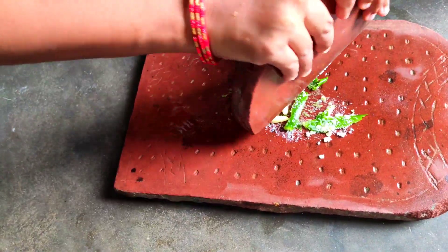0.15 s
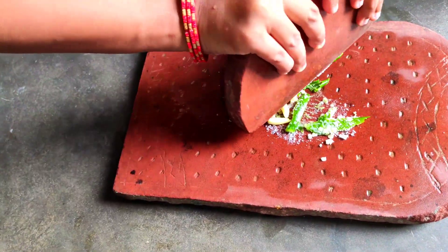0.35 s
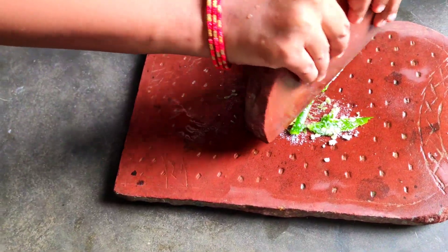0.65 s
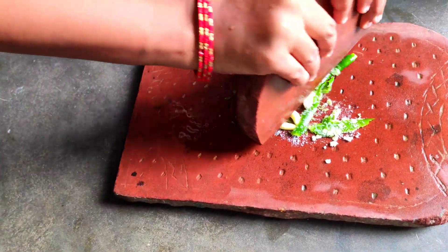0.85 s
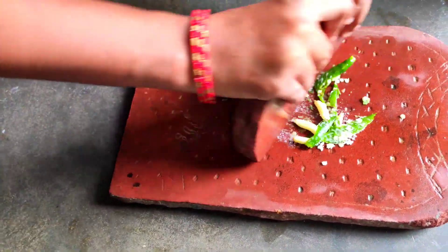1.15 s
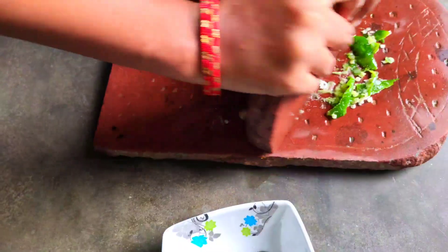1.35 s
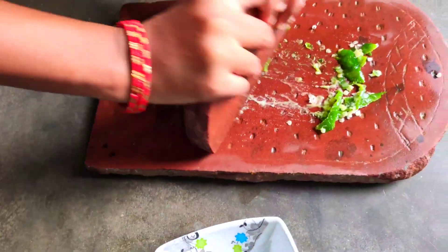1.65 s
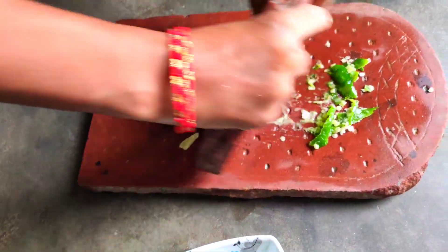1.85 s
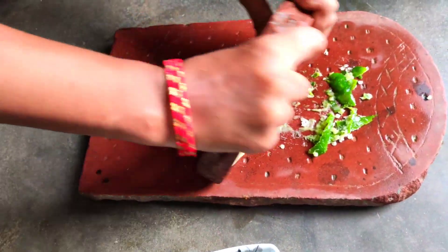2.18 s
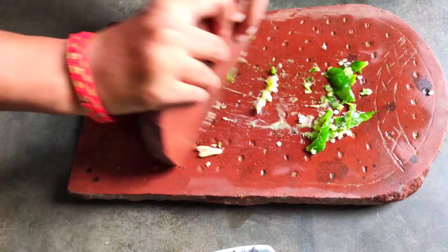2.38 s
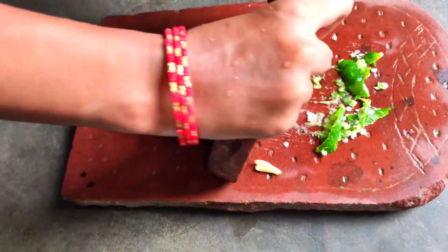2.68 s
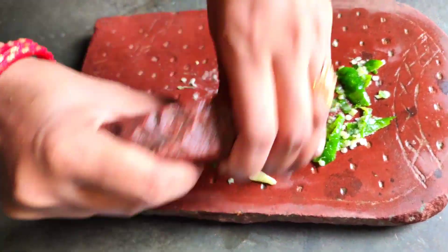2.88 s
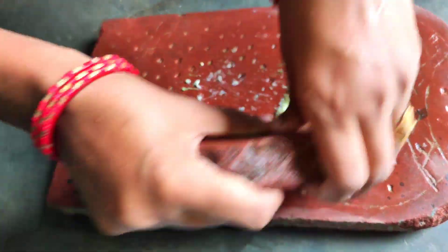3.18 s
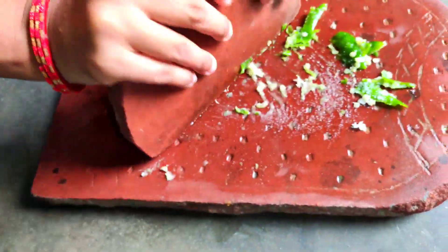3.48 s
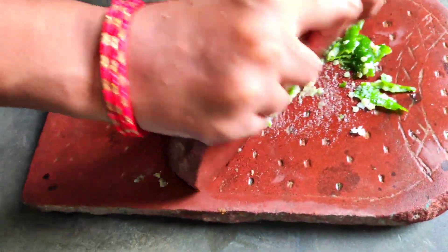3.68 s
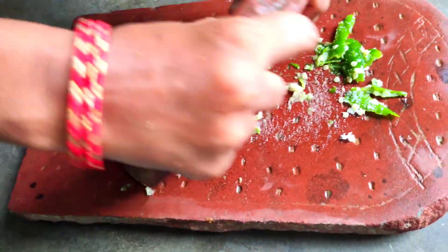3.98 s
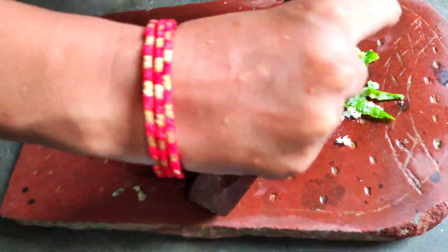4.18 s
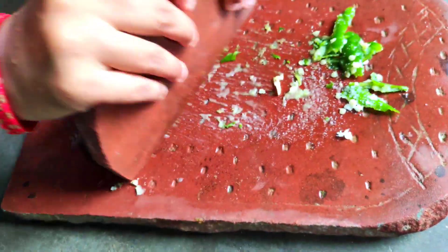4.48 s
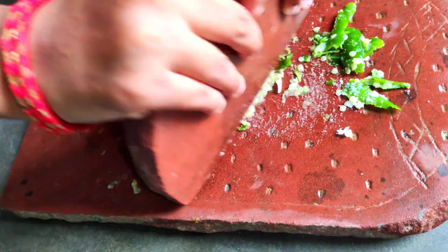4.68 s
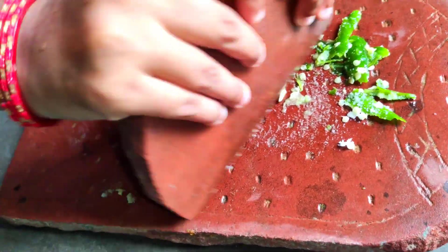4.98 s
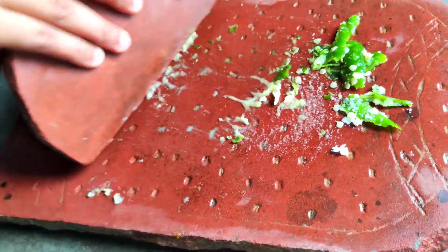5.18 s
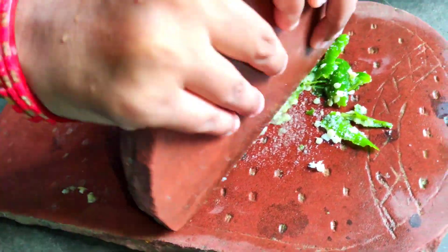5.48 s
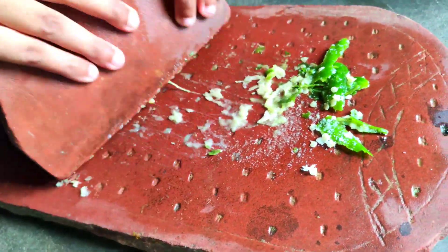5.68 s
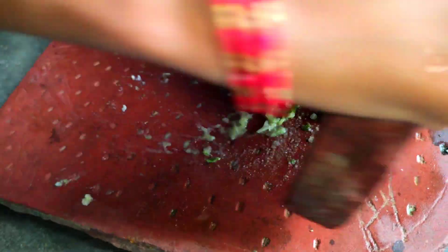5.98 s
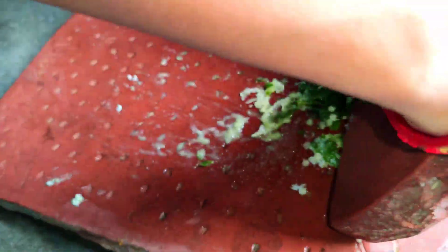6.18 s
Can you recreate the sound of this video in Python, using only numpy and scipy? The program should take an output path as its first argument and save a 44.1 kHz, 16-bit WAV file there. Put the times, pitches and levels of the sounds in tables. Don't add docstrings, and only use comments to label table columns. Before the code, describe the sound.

Close up in a small hard kitchen, a heavy stone slides over a flat stone slab. It opens with light gritty hisses and tiny crackles of salt and skins, then a hard knock starts quick back-and-forth rasping strokes. Loud stone clacks interrupt the rubbing, the heaviest as a pair near the middle. Thin bangles clink later and a faint bird whistles far off.

```python
import sys
import numpy as np
from scipy import signal
from scipy.fft import rfft, irfft
from scipy.io import wavfile

SR = 44100
rng = np.random.default_rng(int(sys.argv[2]) if len(sys.argv) > 2 else 0)


def volts_from_decibels(level):
    exponent = np.asarray(level, float) / 20
    return 10 ** exponent


def wav_record(signal):
    frames = np.transpose(np.atleast_2d(signal))
    bounded = np.clip(frames, -1, 1)
    quanta = np.round(bounded * 32767).astype(np.int16)
    wavfile.write(sys.argv[1], SR, quanta)


N = 279594
T = np.arange(N) / SR
OPPOSITE = np.array([[1], [-1]])


def level(x, db):
    return x * volts_from_decibels(db) / np.sqrt(np.mean(x ** 2))


def walk(rate):
    return np.sqrt(3 / 2) * np.interp(T * rate, np.arange(1024), rng.standard_normal(1024))


def ring(x, modes):
    out = 0
    for k, (hz, width, db) in enumerate(modes):
        pole = np.exp((2j * hz - width) * np.pi / SR)
        resonance = signal.lfilter([0, pole.imag], [1, -2 * pole.real, abs(pole) ** 2], x)
        out = out + (-1) ** k * volts_from_decibels(db) * np.sqrt(width) * resonance
    return out


def near_db(hz, best_hz, db_per_octave):
    return -db_per_octave * np.abs(np.log2(hz / best_hz))


def highpass(x, order, hz):
    return signal.sosfilt(signal.butter(order, hz, "highpass", fs=SR, output="sos"), x)


def add(out, s, sound, db):
    i = int(s * SR)
    sound = sound[:N - i] / np.abs(sound).max()
    out[:, i:i + len(sound)] += sound * volts_from_decibels(db)


def band(x, hz, octaves):
    edges = np.clip(hz * 2. ** (np.array([-.5, .5]) * octaves), 10, .45 * SR)
    return signal.sosfilt(signal.butter(2, edges, "bandpass", fs=SR, output="sos"), x)


def stereo_noise(count, hz, octaves):
    mid, side = band(rng.standard_normal((2, count)), hz, octaves)
    return mid + min(hz / 1100, 1) * side * OPPOSITE


# (frequency [Hz], density [dB per Hz])
AIR_SPECTRUM = [(20, -11.5), (65, 0), (104, -17), (203, -6), (2520, -11.5), (4920, -20), (14600, -23.5),
                (15900, -30)]


def air():
    hz, db = np.transpose(AIR_SPECTRUM)
    out = 0
    for f in 25 * 2 ** np.arange(0, 9.5, .5):
        band_db = np.interp(np.log(f), np.log(hz), db) + 0.71 * walk(2.9)
        out = out + volts_from_decibels(band_db) * stereo_noise(N, f, 0.43)
    return level(out, -61.5)


# (fastest time [s], speeding up [s], slowing down [s], slab rumble [dB], grit rasp [dB re slab])
STROKE_MOTION = [(0.874, .047, 0.059, -31, -4.5), (1.135, 0.05, 0.036, -31, -5.5),
                 (1.279, .047, 0.058, -32, -6.5), (1.494, 0.086, .05, -38, -7),
                 (1.669, 0.057, 0.053, -31.5, -9.5), (2.119, 0.089, 0.06, -31, -9.5),
                 (2.355, 0.064, 0.054, -35.5, -3.5), (2.523, 0.062, .06, -31.5, -6),
                 (3.185, 0.082, .08, -35.5, -17), (3.554, 0.072, 0.051, -33, -9.5),
                 (3.725, 0.051, 0.067, -35, -3.5), (3.892, 0.041, 0.023, -31.5, -20),
                 (3.978, 0.047, 0.032, -38.5, -9), (4.273, 0.06, 0.066, -36, -3),
                 (4.52, 0.09, 0.059, -32.5, -8.5), (4.721, .07, .06, -41, -3.5),
                 (4.912, 0.068, .05, -37, -2), (5.325, 0.048, 0.063, -32, -4),
                 (5.589, 0.085, 0.021, -39.5, 0), (5.719, 0.046, 0.044, -32.5, -10.5),
                 (6.28, 0.065, .055, -34.5, -10)]
# (fastest time [s], speeding up [s], slowing down [s], slab rumble [dB], grit rasp [dB re slab])
LIGHT_SWEEPS = [(0.020, .1, 0.11, -60, -4), (0.110, .02, 0.089, -52, -12), (0.266, .05, .07, -60, 21),
                (0.305, .012, 0.023, -46, -23), (0.451, .1, 0.13, -65, 10.5),
                (0.686, .03, 0.015, -63, 17.5), (0.988, .04, .07, -57.5, 8),
                (3.240, 0.078, 0.096, -54, 9.5), (3.371, 0.11, 0.084, -52, 6.5),
                (5.481, .05, .04, -61.5, 6.5), (6.190, 0.04, .05, -45.5, -14)]
EDGE_DB, EDGE_POWER = -9.5, 2.56


def hand(lag_s, sharp, base_db, share):
    power = np.zeros(N // 32 + 1)
    t = T[::32]
    for s, rise, fall, slab_db, grit_db in STROKE_MOTION + LIGHT_SWEEPS:
        late = t - s - lag_s
        edge = np.abs(late / np.where(late < 0, rise, fall)) ** EDGE_POWER
        power = power + volts_from_decibels(2 * (slab_db + base_db + share * grit_db + sharp * EDGE_DB * edge))
    return np.interp(T, t, power)


# (time [s], peak [dB], muller [dB re slab], muller frequency [Hz], crack [dB re slab])
HARD_BLOWS = [
    (0.702, -2, -4.5, 2410, -22),
    (1.075, -13, -6, 2540, -23),
    (1.93, -4, 4.5, 1793, -9.5),
    (2.907, 0, -12.5, 1730, -35.5),
    (3.048, 1, -8.5, 2104, -29.5),
    (4.1, -1, -1, 1940, -39),
    (5.172, -6, 8, 2825, -6.5),
    (5.525, -15, -10.5, 1850, -17.5),
    (5.545, -10.5, -10.5, 1710, -29),
    (6.082, -9, 3.5, 1556, -34),
]


def skid(muller_share=0, crack_share=0, extra_db=0):
    rise_s, t60_s = 0.007, 0.51
    power = 0
    for s, db, muller_db, _, crack_db in HARD_BLOWS:
        late = np.maximum(T - s, 0)
        start_db = db + muller_share * muller_db + crack_share * crack_db + extra_db - 31
        power = power + np.minimum(late / rise_s, 1) ** 2 * volts_from_decibels(2 * (start_db - 60 * late / t60_s))
    return power


def catches(rate, spread_db, judder_db):
    hit = rng.random(N) < rate / SR
    size = rng.standard_normal(N) * volts_from_decibels(spread_db * np.minimum(rng.exponential(size=N), 4))
    return hit * size * volts_from_decibels(judder_db * walk(70))


def rub(x, modes, patchy_db, best_hz=None):
    out = 0
    for k, mode in enumerate(modes):
        db = patchy_db * walk(25)
        if best_hz is not None:
            db = db + near_db(mode[0], best_hz, 10.2)
        out = out + (-1) ** k * ring(x * volts_from_decibels(db), [mode])
    return out


# (frequency [Hz], width [Hz], level [dB])
SLAB_MODES = [(131, 46, -35.5), (182, 120, -32.5), (254, 170, -23), (341, 29, -13), (505.4, 253, -2.5),
              (634, 106, -0.5), (888, 159, -1.5), (1080, 129, 2), (1243, 260, 0)]
# (frequency [Hz], width [Hz], level [dB])
MULLER_MODES = [(1578, 90, -7), (1850, 207, 6), (2200, 450, 4), (2544, 236, 8), (2944, 850, 5)]
# (frequency [Hz], width [Hz], level [dB])
GRIT_MODES = [(3407, 220, -5.5), (4040, 360, -2), (4750, 520, -5), (5810, 900, -2.5), (6630, 1200, -6)]
# (frequency [Hz], width [Hz], level [dB])
DUST_MODES = [(8690, 1610, -3.5), (10360, 12500, 0), (15200, 3400, -6.5)]
# (time [s], best-driven slab pitch [Hz])
BEARING_PITCH = [(0.12, 600), (0.3, 930), (0.87, 1070), (1.14, 848), (1.49, 700), (1.66, 1100),
                 (2.12, 1000), (2.35, 808), (2.55, 843), (3.0, 812), (3.6, 800), (4.0, 867), (4.27, 750),
                 (4.52, 945), (4.8, 786), (5.33, 902), (5.71, 1023), (6.28, 677)]


def grinding():
    grit_lag_s = 0.0045
    weight = np.sqrt(hand(0, 0.97, 0, 0) + skid())
    ringing_gain = np.sqrt(hand(grit_lag_s / 2, 1, 0, 0.19) + skid(muller_share=1, extra_db=-1))
    rasp_gain = np.sqrt(hand(grit_lag_s, 1.07, 0.12, 0.62) + skid(crack_share=1, extra_db=5))
    hiss_gain = np.sqrt(hand(grit_lag_s, 0.95, -11, 1))

    pressure = np.maximum(weight / volts_from_decibels(-35.5), volts_from_decibels(-26))
    best_hz = np.interp(T, *np.transpose(BEARING_PITCH)) * pressure ** (0.0366 * 20 * np.log10(2))

    coarse = catches(2500, 2.26, 0.54)
    fine = catches(8000, 1.1, 1.76)
    mixed = level(coarse, -11.0) + level(fine, -1)
    body = level(rub(highpass(coarse, 2, 150), SLAB_MODES, 1.5, best_hz), -1.4) * weight
    ringing = level(rub(mixed, MULLER_MODES, 3.6), -1.4) * ringing_gain
    grit = level(rub(fine, GRIT_MODES, 1.5), -1.4) * rasp_gain
    dust = level(ring(rub(fine, DUST_MODES, 1.3), DUST_MODES), -1.4) * hiss_gain

    lag = np.round(4 * walk(9) * OPPOSITE).astype(int)
    return body + ringing + (grit + dust)[np.clip(np.arange(N) + lag, 0, N - 1)]


# (time [s], peak [dB])
EDGE_BURSTS = [(0.092, -32), (0.0938, -19.5), (0.152, -37), (0.166, -33), (0.1819, -32), (0.2035, -33.5),
               (0.2302, -31.5), (0.2487, -30), (0.2583, -33.5), (0.269, -31), (0.2724, -32),
               (0.3194, -39.5), (0.3366, -37), (0.365, -37.5), (0.3838, -38.5), (0.4139, -33.5),
               (0.4508, -46.5), (0.5144, -35.5), (0.5793, -43), (0.6628, -46.5), (0.679, -37), (0.687, -26)]
# (time [s], peak [dB], frequency [Hz])
GRAIN_POPS = [(0.8205, -50, 5000), (0.844, -30.5, 5110), (0.89, -29.5, 6170), (0.985, -31, 5060),
              (0.992, -34, 5500), (1.227, -30.5, 5330), (1.6048, -33, 4300), (2.4539, -26.5, 6800),
              (3.471, -39, 5460), (5.2728, -24.5, 6200), (5.8755, -38, 5310)]


def crackle():
    out, t = np.zeros((2, N)), T[:1024]
    bursts = [(s, db, 5530 * (1 + 0.02 * rng.standard_normal())) for s, db in EDGE_BURSTS]
    for s, db, hz in bursts + GRAIN_POPS:
        puff = rng.standard_normal(len(t)) * (np.exp(-t / 0.00029) + 0.11 * np.exp(-t / 0.0088))
        cycles = ring(ring(puff, [(hz, 2200, 0)]), [(hz, 2200, 0)])
        add(out, s, cycles, db + 4.0)
        add(out, s, ring(puff, DUST_MODES), db - 33.0)
    return out


# (time [s], peak [dB], muller [dB re slab], muller frequency [Hz], crack [dB re slab])
EDGE_TRIPS = [(0.119, -53, -26, 2050, -8), (0.299, -26.5, -23, 1700, -36),
              (0.841, -22.5, -2.5, 2520, -22.5), (1.246, -30.5, 12, 2570, 1.5),
              (1.638, -30.5, -11.5, 2000, -14), (2.034, -26, 8.5, 1830, -24.5),
              (2.074, -17, -6.5, 1850, -15.5), (2.133, -13, -20, 1740, -12), (3.689, -21.5, -7, 1960, -27),
              (4.445, -36.5, 6, 1790, -35), (5.188, -18, 1, 1890, -30.5), (5.673, -44, -10, 2540, -20)]
# (time [s], peak [dB])
FLOOR_THUDS = [
    (0.7, -43.5),
    (1.073, -53),
    (1.928, -44),
    (2.909, -35.5),
    (3.046, -32),
    (4.1, -47),
    (5.167, -31),
    (5.523, -46.5),
    (6.082, -43.5),
]


def blows():
    out, t = np.zeros((2, N)), T[:4096]
    tap = np.exp(-((t - .0003) / .00006) ** 2)
    push = highpass(tap, 3, 480)
    impacts = [(blow, 1011) for blow in HARD_BLOWS] + [(trip, 1100) for trip in EDGE_TRIPS]
    for (s, db, muller_db, muller_hz, crack_db), knock_hz in impacts:
        start = s - .0009
        hz = knock_hz * (1 + 0.033 * rng.standard_normal())
        crack = rng.standard_normal(len(t)) * np.minimum(t / 0.0024, 1) * np.exp(-t / 0.0035)
        slab = [(f, 5.64 * w, g + near_db(f, hz, 7.2)) for f, w, g in SLAB_MODES]
        muller = [(f, 0.94 * w, g + near_db(f, muller_hz, 9)) for f, w, g in MULLER_MODES]
        add(out, start, ring(ring(push, [(hz, 700, 0)]), [(hz, 600, 0)]), db + 0.5)
        add(out, start, ring(push, slab), db - 7)
        add(out, start, ring(ring(push, [(2200, 3740, 0)]), muller), db + muller_db + 2.0)
        add(out, start, ring(crack, GRIT_MODES), db + crack_db + 4)
        add(out, start, ring(crack, DUST_MODES), db + crack_db - 34)
    thud = ring(tap, [(75, 300, -7), (182.5, 24, 2.5), (243, 16, -4.5)])
    for s, db in FLOOR_THUDS:
        add(out, s, thud, db + 3.0)
    return out


# (time [s], peak [dB], frequency [Hz], upper modes [dB re lower], damping [1 = free])
BANGLE_CLINKS = [
    (2.564, -27.5, 9180, -19.5, 1),
    (3.03, -53, 9900, -9, 2.35),
    (3.9896, -35.5, 9660, -20, 0.99),
    (4.519, -26, 9260, -16, 1.6),
    (4.9823, -28.5, 9640, -19, 3.5),
    (5.4197, -34, 9600, -6.5, 5.5),
    (5.4447, -37, 9800, -8.5, 6),
    (5.875, -33, 9880, -13, 5.5),
]
# (frequency [Hz], width [Hz], level [dB])
BANGLE_MODES = [(9180, 29, -4.5), (9330, 10, -7), (7400, 50, -23), (10000, 65, -18.5), (14600, 30, -9),
                (15410, 36, -7), (14100, 60, -7.5)]


def bangles():
    out, tap = np.zeros((2, N)), np.exp(-T[:8192] / .0002)
    for s, db, hz, upper_db, damping in BANGLE_CLINKS:
        touch = tap * rng.standard_normal(len(tap))
        modes = [(f, w * max(damping, .5), g) for f, w, g in BANGLE_MODES]
        add(out, s, ring(touch, modes[:4] + [(hz, 70, -2)]), db)
        add(out, s, ring(touch, modes[4:]), db + upper_db + 9)
    return out


# (time [s], frequency [Hz], level [dB])
BIRD_NOTES = [
    [(4.03, 1925, -66), (4.095, 1940, -55)],
    [(5.0, 1950, -64), (5.045, 1925, -59), (5.17, 1900, -69)],
    [(5.91, 2300, -68), (5.99, 2200, -70)],
    [(6.0, 2200, -73.5), (6.05, 2120, -58), (6.08, 2110, -66)],
    [(5.92, 2650, -66), (5.97, 2700, -72)],
]


def bird():
    out = 0
    for s, hz, db in (np.transpose(note) for note in BIRD_NOTES):
        fade = np.clip(np.minimum(T - s[0], s[-1] - T) / 0.011, 0, 1)
        pitch = np.interp(T, s, hz) * (1 + 0.017 * walk(90))
        loudness = volts_from_decibels(np.interp(T, s, db) + 5.5 + 4.3 * walk(60))
        out = out + fade * loudness * np.sqrt(2) * np.sin(2 * np.pi * np.cumsum(pitch) / SR)
    return out


# (frequency [Hz], decay time T60 [s], level [dB])
ROOM_DECAY = [(162, 0.64, -4.5), (376.3, 0.34, 5.5), (883, 0.088, -4), (1890, 0.31, -2), (4300, 0.3, -5),
              (9750, 0.041, -5)]


def kitchen(x):
    t, place, out = T[:SR // 2], 1.485 * walk(3), 0
    for share in (np.cos(place), np.sin(place)):
        tail = sum(volts_from_decibels(db - 60 * t / t60) * stereo_noise(len(t), hz, 1.303) for hz, t60, db in ROOM_DECAY)
        tail = tail * (np.clip(t / 0.00035, 0, 1) + 0.5 * np.exp(-t / 0.0086))
        tail = tail * volts_from_decibels(-8.5) / np.sqrt(np.sum(tail ** 2) / 2)
        out = out + signal.fftconvolve((x * share)[None], tail)[:, :N]
    wall_s, wall_db = 0.02, -19.5
    return out + volts_from_decibels(wall_db) * np.pad(x, (int(wall_s * SR), 0))[:N]


# (frequency [Hz], left lead [rad])
PORT_LEAD = [(0, 0.5), (900, -0.5), (1500, -1.5), (2760, -2), (4500, -2.5), (15700, -47.5)]
# (frequency [Hz], left minus right [dB])
PORT_SHADE = [(60, -1), (200, 1), (700, 0), (1290, 0.5), (2380, 3), (4400, 7), (8120, -1), (15000, -1.5)]


def ports(x):
    f, sign = np.arange(N // 2 + 1) * SR / N, OPPOSITE / 2
    hz, db = np.transpose(PORT_SHADE)
    gain = volts_from_decibels(sign * np.interp(np.log(f + 1), np.log(hz), db))
    turn = np.exp(1j * sign * np.interp(f, *np.transpose(PORT_LEAD)))
    return irfft(rfft(x) * gain * turn, N)


def scene():
    background = air()
    near = grinding() + crackle() + blows() + bangles()
    return ports(near + kitchen(near.mean(axis=0)) + bird() + background)


def low_pass(x):
    return signal.sosfilt(signal.butter(12, 16070, fs=SR, output="sos"), x)


def record(dry):
    mix = np.clip(dry, -1, 1)
    return low_pass(mix)


dry = scene()
out = record(dry)
wav_record(out)
```